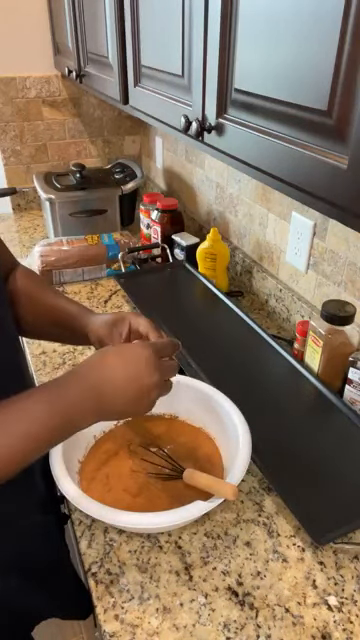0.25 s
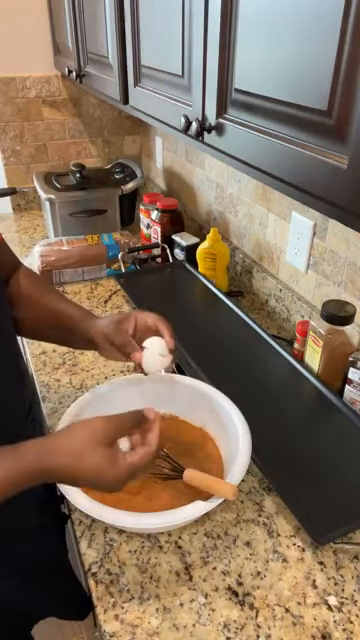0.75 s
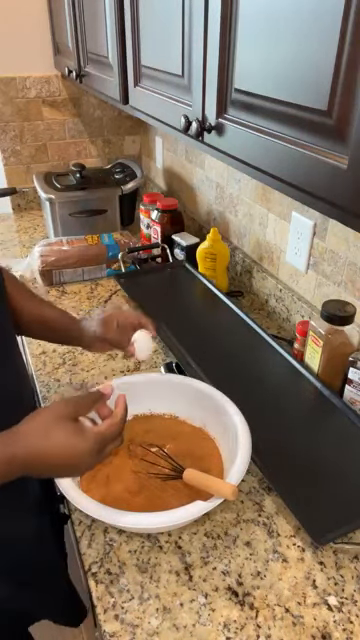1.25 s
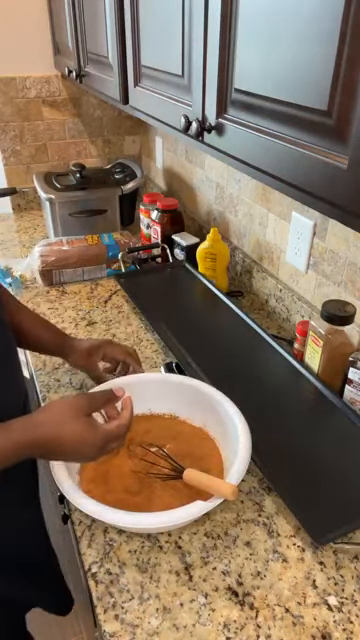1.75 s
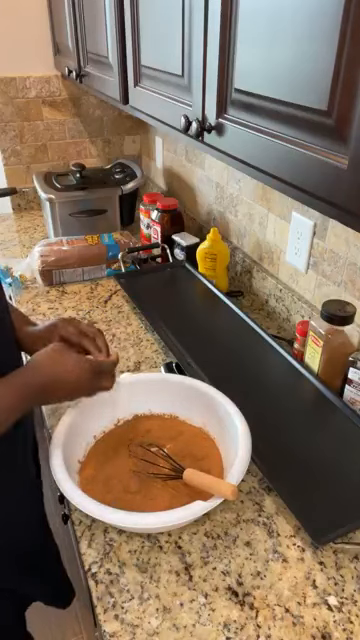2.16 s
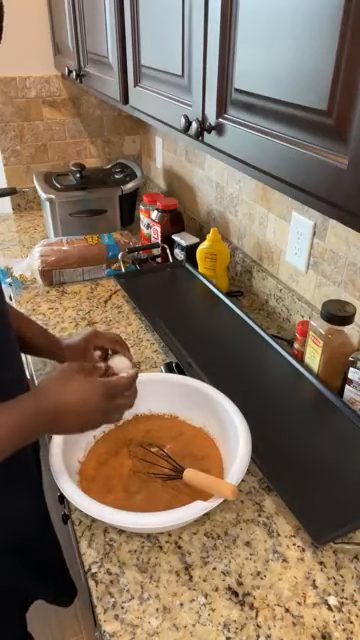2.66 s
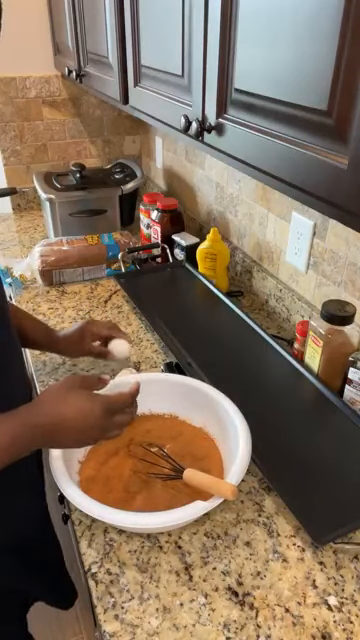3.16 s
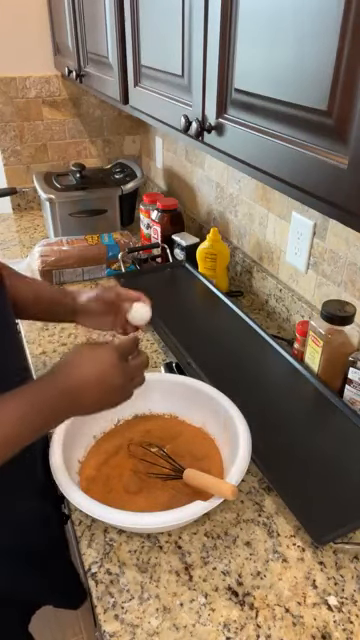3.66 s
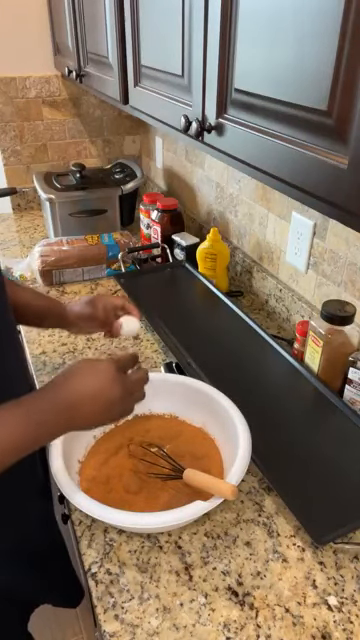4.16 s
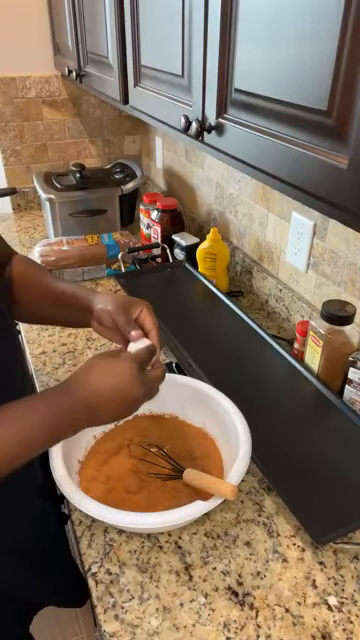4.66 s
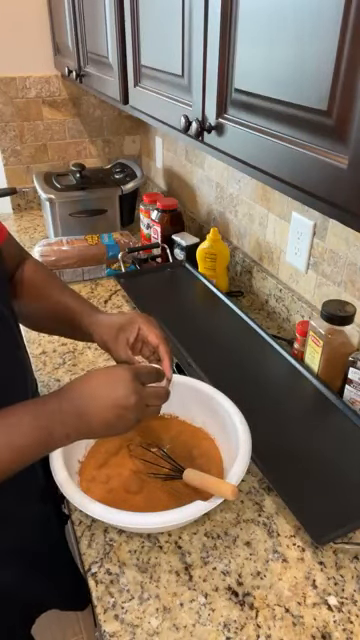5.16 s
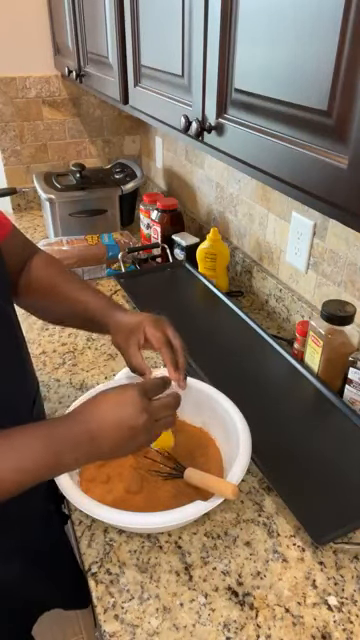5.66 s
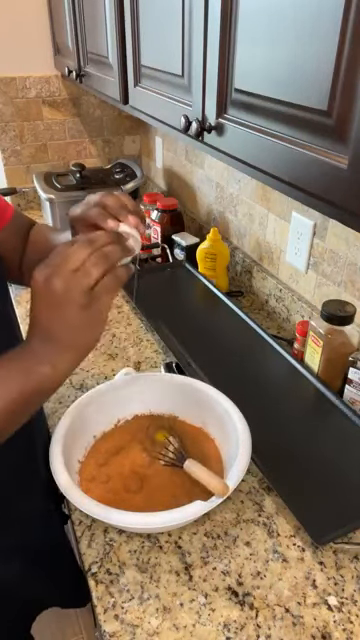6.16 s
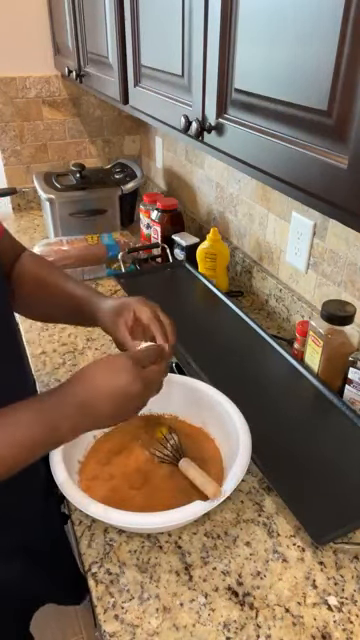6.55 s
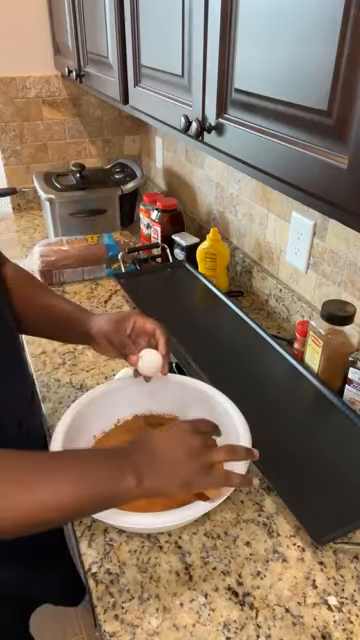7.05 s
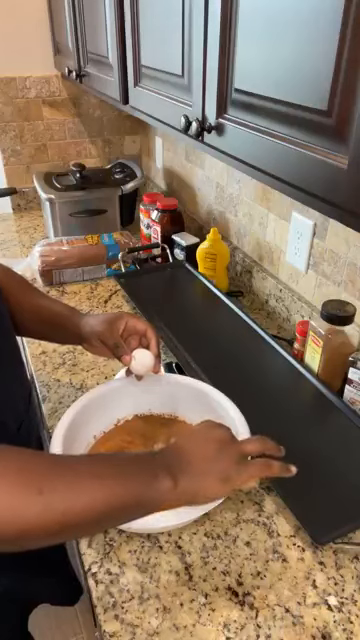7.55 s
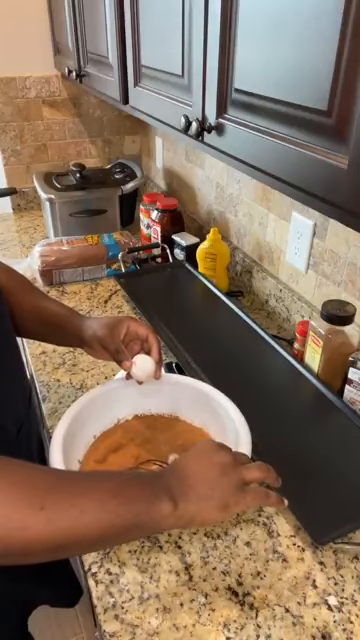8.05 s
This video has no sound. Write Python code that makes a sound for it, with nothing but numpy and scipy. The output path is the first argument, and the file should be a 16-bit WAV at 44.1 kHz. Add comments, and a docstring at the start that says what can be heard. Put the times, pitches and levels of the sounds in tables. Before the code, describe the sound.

Close in a live, hard-surfaced kitchen, empty eggshells click and slide together with small hollow tocks. An egg then knocks a plastic bowl of batter: a dull knock, a hard bright crack with a slight whisk rattle, and later a softer crunch. More shell clicks, dry rubs and soft hand brushes follow, ending in a muted tap. A faint wavering appliance hum and airy room noise run throughout.

```python
"""In a live kitchen, eggs are knocked on the rim of a plastic bowl: dull knock, hard crack, crunch, last tap.
Each blow rings the modes of the bowl and of a wire whisk lying in it, and gives a burst of brittle clicks.
Between blows the shells click, rub and crackle: fine impulses through shell modes and a hollow, mostly sinking pitch.
Hands brush as a dull swish of filtered slips. An appliance hums faintly as wavering tones over a rush of air."""
import sys
import numpy as np
from scipy import signal
from scipy.fft import rfft, irfft
from scipy.io import wavfile

SR = 44100
rng = np.random.default_rng(int(sys.argv[2]) if len(sys.argv) > 2 else 0)


def store_pcm(level_fs):
    """Save levels as 16-bit WAV."""
    pcm = np.round(np.clip(level_fs, -1, 1) * 32767).astype(np.int16)
    wavfile.write(sys.argv[1], SR, np.atleast_2d(pcm).T)


N = 366912
TIME = np.arange(N) / SR


def from_db(db):
    """Decibels to gain."""
    return 10 ** (np.asarray(db) / 20)


def unit(x):
    """Scale to an energy of one."""
    return x / np.sqrt(np.sum(x ** 2) + 1e-30)


def at_hz(points, hz, axis=1):
    """Read a column of a table on a log-frequency axis."""
    points = np.array(points)
    return np.interp(np.log(hz + 1e-3), np.log(points[:, 0]), points[:, axis])


def cut(x, hz, kind, order=2):
    """Butterworth filter."""
    sections = signal.butter(order, np.clip(hz, 10, .47 * SR), kind, fs=SR, output="sos")
    return signal.sosfilt(sections, x + 1e-18)


def resonate(x, hz, width_hz):
    """Two-pole resonance with a gain of one on top."""
    r = np.exp(-np.pi * width_hz / SR)
    zeros = np.array([1, 0, -1]) * (1 - r * r) / 2
    poles = [1, -2 * r * np.cos(2 * np.pi * hz / SR), r * r]
    return signal.lfilter(zeros, poles, x + 1e-18)


def colour(x, spectrum, size=8192):
    """Causal (minimum-phase) filter with the given spectrum."""
    gain = from_db(at_hz(spectrum, np.fft.rfftfreq(size, 1 / SR)))
    cepstrum = irfft(np.log(gain))
    # fold the cepstrum forward in time
    cepstrum[1:size // 2] *= 2
    cepstrum[size // 2 + 1:] = 0
    impulse = irfft(np.exp(rfft(cepstrum)))
    return signal.fftconvolve(x, impulse)[:len(x)]


def add(track, s, sound, db, seconds):
    """Mix in a sound with the energy of a level held for so many seconds."""
    start = round(s * SR)
    sound = unit(sound) * from_db(db) * np.sqrt(seconds * SR)
    sound = sound[max(-start, 0):]
    start = max(start, 0)
    track[start:start + len(sound)] += sound[:max(N - start, 0)]


def grains(envelope, per_s, spread_db):
    """Tiny impulses of uneven size, at random moments under an envelope."""
    n = len(envelope)
    sizes = from_db(spread_db * np.minimum(rng.exponential(1, n), 3))
    signs = rng.choice([-1, 1], n)
    hits = rng.random(n) < per_s / SR
    return unit(envelope * sizes * signs * hits)


def snap(length, first, per_s, size=16384):
    """A first contact, then a spray of smaller ones that builds up and dies away."""
    age = TIME[:size] / max(length, 1e-4)
    force = grains(np.exp(-age) * (1 - np.exp(-age / 0.044)), per_s, spread_db=2.5)
    force[0] += first
    return force


def ringing(modes):
    """Decaying sines after one blow."""
    t = TIME[:SR]
    return sum(from_db(db - 60 * t / t60) * np.sin(2 * np.pi * hz * t) for hz, db, t60 in modes)


# Eggs hitting the rim. Each row: start in seconds, push length in seconds, bowl boom in dB, counter thump in dB,
# wall knock in dB, knock top in Hz, whisk ring in dB, crack in dB, crack decay in seconds, crack top in Hz.
EGG_BLOWS = [(3.0632, 0.0021, -30.5, -33, -31, 1092, -50.5, -52, 0.0077, 7920),
             (3.495, 0.0046, -31, -34.5, -46, 1090, -39.5, -25.5, 0.015, 12500),
             (4.433, 0.0061, -36.5, -40, -48.5, 1180, -78, -40, 0.021, 13400),
             (8.221, 0.0015, -56.5, -36.5, -41.5, 629, -54, -41, 0.031, 2463)]
# Modes of the bowl of batter on the counter. Each row: pitch in Hz, relative level in dB,
# t60 in seconds (before the hand damps the wall).
BOWL_MODES = [(61, -12.5, 0.4), (121, -19.5, 0.8), (190.8, 0, 0.31), (223, -14, 0.4), (318, -20.5, .4),
              (359, -9, 0.46), (411, -4, 0.35), (448, -6, 0.27), (507, -13, 0.45), (608, -11.5, 0.37),
              (661, -10, .5), (795, -26, .5), (860, -28, 0.54), (963, -8, 0.41), (1065, -19, 0.35),
              (1159, -15.5, .35)]
WALL_DAMP_S = 0.061   # the hand damps the wall: extra fall to 1/e


def bowl():
    """The whole bowl booms on its base and thumps the counter; its wall chatters higher up and jolts the whisk."""
    out = np.zeros(N)
    base = ringing([mode for mode in BOWL_MODES if mode[0] < 270])
    wall = ringing([mode for mode in BOWL_MODES if mode[0] >= 270])
    wall = wall * np.exp(-TIME[:SR] / WALL_DAMP_S)
    for s, push_s, boom_db, thump_db, wall_db, top_hz, ring_db, *_ in EGG_BLOWS:
        push = np.sin(np.linspace(0, np.pi, int(push_s * SR) + 3))   # a longer push favours the deepest mode
        boom = signal.fftconvolve(base, push)
        chatter = snap(0.01, first=0.24, per_s=3100)
        rattle = unit(cut(chatter, [280, 1000], "band"))
        knock = unit(wall[:len(chatter)]) + from_db(1.0) * rattle
        thump = cut(snap(0.045, first=0.095, per_s=2500), [75, 260], "band")
        add(out, s + 0.0018, boom, boom_db, seconds=0.015)
        add(out, s + 0.0009, thump, thump_db, seconds=0.013)
        add(out, s + .002, cut(knock, top_hz, "low", order=5), wall_db, seconds=0.0079)
        add(out, s, whisk(), ring_db, seconds=0.0086)
    return out


# Spectrum of the brittle clicks at a blow. Each row: frequency in Hz, relative level in dB per Hz.
CRACK_SPECTRUM = [(400, -31), (650, -21), (930, -5.5), (1150, -11), (1400, -5.5), (1900, -7), (2700, -13),
                  (3300, -8.5), (4300, -12), (6000, -8.5), (7700, -9.5), (8800, -17.5), (11000, -19.5),
                  (13000, -29)]


def cracks(second_peak_s=.006):
    """Each blow of shell on rim gives a burst of brittle clicks, with a second peak about 6 ms later."""
    out = np.zeros(N)
    for s, *_, db, length, top_hz in EGG_BLOWS:
        second_peak = np.roll(snap(0.0026, first=1.0, per_s=4100), int(second_peak_s * SR))
        burst = snap(length, first=0.091, per_s=7000) + .5 * second_peak
        brittle = colour(burst, CRACK_SPECTRUM)
        add(out, s, cut(brittle, top_hz, "low"), db, seconds=0.0073)
    return out


# Modes of the wire whisk in the bowl. Each row: pitch in Hz, relative level in dB,
# t60 in seconds (before the batter damps it).
WHISK_MODES = [(1837, -1, 0.3), (2610, -8.5, 0.17), (3450, -7.5, .2), (5200, -4.5, .25), (5480, -4, 0.23),
               (5700, -5, 0.21), (6884, -2, .3), (7900, -6.5, .25), (8430, -7.5, .2), (9260, -9.5, .2)]
WHISK_DAMP_S = .07   # the batter damps the wires: extra fall to 1/e


def whisk(rattle=1.0, rattle_hz=70):
    """The wires touch each other and the batter, so their ring is rough and soon damped."""
    flutter = unit(cut(rng.standard_normal(SR), rattle_hz, "low")) * np.sqrt(SR)
    return ringing(WHISK_MODES) * (1 + rattle * flutter) * np.exp(-TIME[:SR] / WHISK_DAMP_S)


# Resonances of an empty half shell. Each row: centre in Hz (before detuning), width in Hz, relative level in dB.
SHELL_MODES = [(2820, 1770, -5.5), (3920, 500, 1), (4205, 400, 0.5), (5630, 400, 2), (6730, 266, 0),
               (7470, 400, 0), (10420, 1360, -6)]


def shell(force, detune=0.042):
    """A force excites the shell modes, whose pitches shift a little at random each time."""
    out = 0
    for k, (hz, width_hz, db) in enumerate(SHELL_MODES):
        shifted_hz = hz * np.exp(detune * rng.normal())
        out = out + (-1) ** k * from_db(db) * resonate(force, shifted_hz, width_hz)
    return out


# Two half shells are held together, and one slides home in the other. Each row: slide middle in seconds,
# held before it in seconds, held after it in seconds, open hollow in Hz, seated hollow in Hz,
# hollow width in Hz, fine crackle in dB.
SHELL_GRIPS = [(0.151, 0.14, 0.24, 1690, 1310, 415, -73.5), (.66, 0.25, 0.029, 1670, 1680, 517, -75.5),
               (2.19, 0.92, .19, 1525, 1270, 165, -89.5), (5.93, 0.33, 0.26, 2320, 1680, 322, -81),
               (6.38, .18, 0.16, 1640, 1530, 800, -82), (6.945, 0.29, .35, 1784, 1038, 160, -78),
               (7.8, .17, 0.065, 1800, 1300, 1093, -82.5)]
SLIDE_S = 0.06   # half the time a shell takes to slide home


def grip_at(s):
    """The grip that holds at this moment, or the nearest one."""
    return min(SHELL_GRIPS, key=lambda grip: max(grip[0] - grip[1] - s, s - grip[0] - grip[2]))


def hollow(force, s, skirt_hz=1500):
    """Air between two half shells rings at one pitch, gliding from open to seated; the force sets in at s."""
    slide_s, _, _, open_hz, seated_hz, width_hz, _ = grip_at(s)
    seated = (1 + np.tanh((s + TIME[:len(force)] - slide_s) / SLIDE_S)) / 2
    hz = open_hz * (seated_hz / open_hz) ** seated
    # a one-pole ring in a frame that turns with the gliding pitch
    turn = np.exp(2j * np.pi * np.cumsum(hz) / SR)
    decay = np.exp(-np.pi * width_hz / SR)
    ring = turn * signal.lfilter([1], [1, -decay], force / turn + 1e-18)
    return resonate(ring.real, hz[0], skirt_hz)


# Shell edges clicking together. Each row: start in seconds, tick in dB, tick top in Hz, hollow in dB.
SHELL_CLICKS = [(0.1319, -49.5, 7000, -45.5), (.262, -44, 11900, -50.5), (.592, -55.5, 8650, -52.5),
                (.662, -61, 7800, -68), (1.316, -72, 9100, -63.5), (1.575, -81, 9200, -64),
                (1.678, -64.5, 6860, -56), (1.999, -58.5, 9300, -48.5), (2.119, -69, 9000, -51.5),
                (5.725, -61, 8100, -79), (5.812, -61.5, 9700, -61), (6.051, -52, 11600, -51),
                (6.075, -52, 10500, -59), (6.221, -75, 6000, -56), (6.2834, -41, 8200, -51.5),
                (6.739, -54.5, 8040, -45), (6.914, -87, 9000, -45.5), (7.0435, -46.5, 10000, -56),
                (7.173, -46.5, 6030, -68), (7.1939, -42, 10500, -44.5), (7.649, -59, 6100, -67),
                (8.179, -59, 7300, -74.5), (8.223, -39.5, 5700, -38.5)]
# a loud click is over at once, a soft one lasts longer, up to a limit
HARD_CLICK_DB, HARD_CLICK_S, LENGTH_DOUBLES_DB, LONGEST_CLICK_S = -42, 0.0032, 7, 0.0067


def clicks():
    """Shell edges catch and let go; each touch also sounds the hollow. Gives (shell, hollow)."""
    edge, air = np.zeros((2, N))
    for s, tick_db, top_hz, hollow_db in SHELL_CLICKS:
        doublings = (HARD_CLICK_DB - tick_db) / LENGTH_DOUBLES_DB
        length = min(HARD_CLICK_S * 2 ** doublings, LONGEST_CLICK_S)
        force = snap(length, first=0.17, per_s=9000)
        add(edge, s, cut(shell(force), top_hz, "low", order=3), tick_db, seconds=0.0017)
        add(air, s, hollow(force, s), hollow_db, seconds=0.003)
    return np.array([edge, air])


# Shell sliding on shell. Each row: middle in seconds, length in seconds, grit in dB, hollow in dB.
SHELL_RUBS = [(0.016, 0.1, -71, -68.5), (0.151, .05, -68, -58.5), (0.493, 0.084, -70.5, -64),
              (1.348, 0.087, -95, -72), (2.022, .046, -86, -47.5), (2.146, 0.064, -65, -54.5),
              (2.283, .12, -55, -54.5), (5.298, .06, -73, -78), (5.844, 0.11, -66.5, -76),
              (5.978, 0.022, -85, -58.5), (6.402, .067, -57, -54), (6.832, .14, -67.5, -57.5),
              (7.044, 0.026, -55.5, -47.5), (7.087, 0.072, -60.5, -62), (7.231, 0.043, -73, -55.5),
              (7.77, .06, -67.5, -65)]


def rubs():
    """One half slides into the other in a swell of fine slips. Gives (shell, hollow)."""
    edge, air = np.zeros((2, N))
    for middle, length, grit_db, hollow_db in SHELL_RUBS:
        s = middle - length / 2
        swell = np.pad(np.hanning(int(length * SR)), (0, SR // 20))   # leaves room to ring out
        force = grains(swell, per_s=3800, spread_db=5.5)
        scrape = unit(cut(shell(force), 7900, "low", order=4))
        body = unit(cut(force, [500, 2800], "band"))
        add(edge, s, scrape + from_db(-1.0) * body, grit_db, seconds=0.25 * length)
        add(air, s, hollow(force, s), hollow_db, seconds=0.26 * length)
    return np.array([edge, air])


# tiny chips under the fingers; their hollow is set against their shell sound
CRACKLE_PER_S, CRACKLE_TOP_HZ, CRACKLE_HOLLOW_DB = 770, 7150, 1.5


def crackle():
    """As long as a shell is gripped, tiny chips give way at random. Gives (shell, hollow)."""
    edge, air = np.zeros((2, N))
    for s, before, after, *_, db in SHELL_GRIPS:
        start, length = s - before, before + after
        hold = signal.windows.tukey(int(length * SR), alpha=.2)
        force = grains(hold, CRACKLE_PER_S, spread_db=4.0)
        add(edge, start, cut(shell(force), CRACKLE_TOP_HZ, "low", order=3), db, seconds=length / 2)
        add(air, start, hollow(force, start), db + CRACKLE_HOLLOW_DB, seconds=length / 2)
    return np.array([edge, air])


# Hands brushing over each other. Each row: middle in seconds, length in seconds, level in dB.
HAND_BRUSHES = [(5.701, 0.18, -73), (6.351, 0.22, -63), (6.802, .14, -61.5), (7.777, .13, -65.5)]


def brushes():
    """Skin slips on skin in many fine grains: a soft, dull swish."""
    out = np.zeros(N)
    for middle, length, db in HAND_BRUSHES:
        force = grains(np.hanning(int(length * SR)), per_s=6300, spread_db=8.0)
        add(out, middle - length / 2, cut(force, [190, 900], "band"), db, seconds=0.72 * length)
    return out


# Echo of the kitchen. Each row: frequency in Hz, t60 in seconds, echo level in dB.
KITCHEN_BANDS = [(60, 0.55, -15), (190, 0.32, -7), (497, 0.5, 0.5), (1290, 0.74, 4.5), (3430, 0.64, 1),
                 (7200, 0.56, -0.5), (12000, 0.2, 1.5)]


def kitchen_echo():
    """Echoes off counter and cupboards: a diffuse tail, stronger early on, dying band by band."""
    t, out = TIME[:SR], 0
    edges = np.geomspace(40, 16000, 16)
    white = rng.standard_normal((2, SR))
    for k, (low, high) in enumerate(zip(edges, edges[1:])):
        hz = np.sqrt(low * high)
        tail = from_db(-60 * t / at_hz(KITCHEN_BANDS, hz))
        early = 1 + 0.88 * np.exp(-t / 0.01)
        onset = 1 - np.exp(-t / 0.0031)
        # neighbouring bands use different noise
        band = unit(cut(white[k % 2], [low, high], "band") * tail * early * onset)
        level = from_db(at_hz(KITCHEN_BANDS, hz, axis=2))
        out = out + band * np.sqrt(2 * (high - low) / SR) * level
    return out


def reverberate(x):
    """One path through the kitchen."""
    return signal.fftconvolve(x, kitchen_echo())[:N]


SHELL_TURN_S = .0012   # time in which the shell sound turns a new way


def scatter(x):
    """Shell sound radiates in a wandering direction, so successive clicks blend two kitchen paths anew."""
    direction = np.cumsum(rng.standard_normal(N)) / np.sqrt(SHELL_TURN_S * SR)
    return reverberate(x * np.cos(direction)) + reverberate(x * np.sin(direction))


# Tones of the appliance. Each row: pitch in Hz, level in dB rms before the waver.
HUM_TONES = [(59.2, -83.5), (183.0, -77), (366.1, -83.5), (581.4, -73.5), (635.2, -79.5), (904.4, -87)]
# Spectrum of the room air. Each row: frequency in Hz, relative level in dB per Hz.
AIR_SPECTRUM = [(18, -33.5), (30, -22.5), (58, 1.5), (149, -11), (182, -1), (212, -11), (362, -14.5),
                (443, -16), (586, -13.5), (683, -23), (926, -23), (1020, -23), (3060, -43), (3560, -35),
                (13000, -54.5)]
AIR_DB = -65.5   # rms


def background(waver=.25):
    """Motor tones wavering in level and phase, over a soft rush of air made of coloured noise."""
    air = from_db(AIR_DB) * unit(colour(rng.standard_normal(N), AIR_SPECTRUM)) * np.sqrt(N)
    hum = 0
    for hz, db in HUM_TONES:
        drift = unit(cut(rng.standard_normal((2, N)), 6.9, "low"))
        swing, phase = drift * np.sqrt(2 * N) * waver
        tone = np.sin(2 * np.pi * hz * TIME + phase)
        hum = hum + np.sqrt(2) * from_db(db) * (1 + swing) * tone
    return air + hum


def scene():
    """Everything sits in the middle; only the treble of the shells' echo spreads sideways."""
    edges, hollows = clicks() + rubs() + crackle()
    shell_cracks = cracks()
    soft = bowl() + hollows + brushes()
    # the small clicks are sent to the room more weakly than the cracks; the deep boom is heard direct
    brittle_sent = from_db(2.0) * shell_cracks + from_db(-1.0) * edges
    soft_sent = cut(soft, 370, "high", order=4)
    direct = shell_cracks + edges + soft
    mid = direct + scatter(brittle_sent) + reverberate(soft_sent) + background()
    side = from_db(-4.5) * cut(scatter(brittle_sent), 3700, "high", order=8)
    return np.array([mid + side, mid - side])


CUTOFF_HZ = 13200


def record(dry):
    """The microphone drops the deepest bass, and a steep low-pass cuts the top."""
    top = signal.ellip(10, .2, 70, CUTOFF_HZ, fs=SR, output="sos")
    return signal.sosfilt(top, cut(dry, 55, "high", order=4))


dry = scene()
out = record(dry)
store_pcm(out)
```